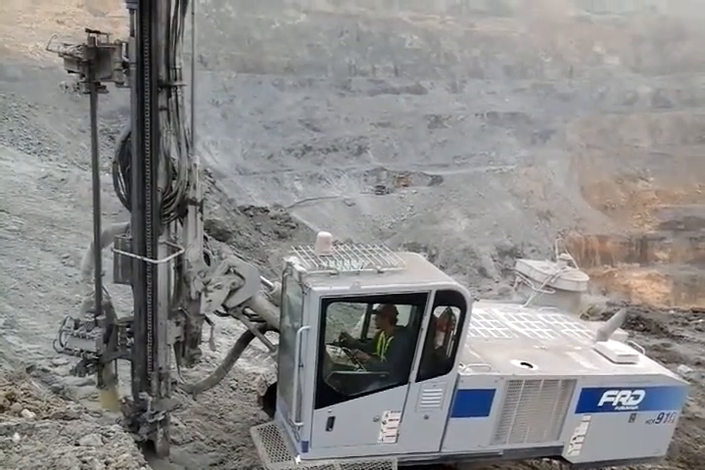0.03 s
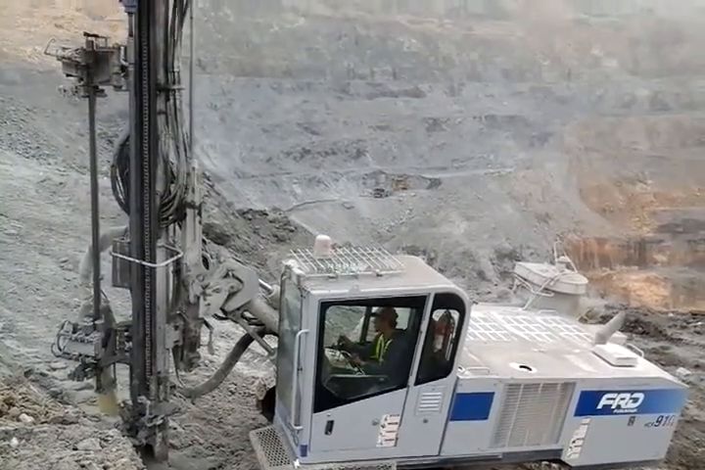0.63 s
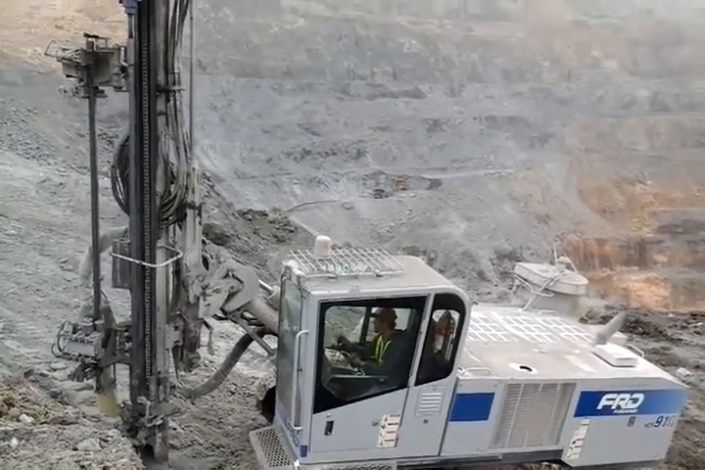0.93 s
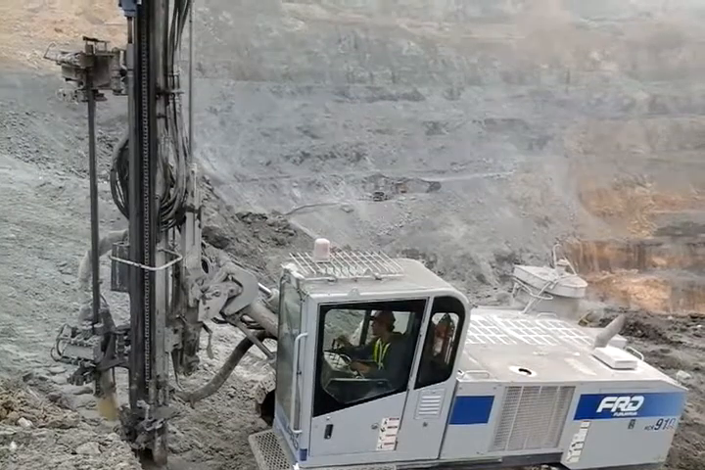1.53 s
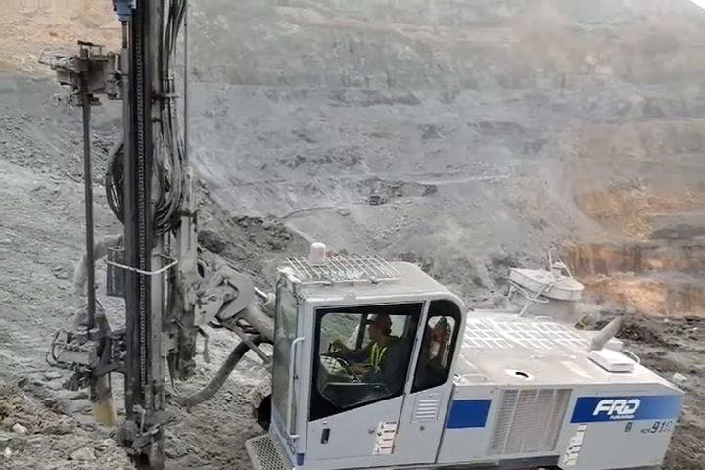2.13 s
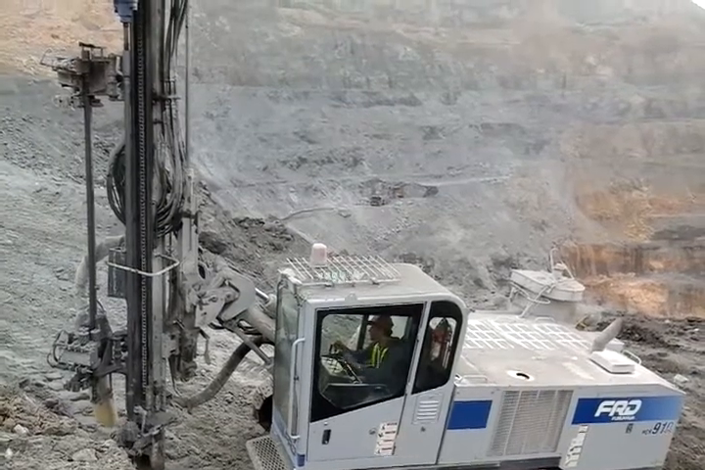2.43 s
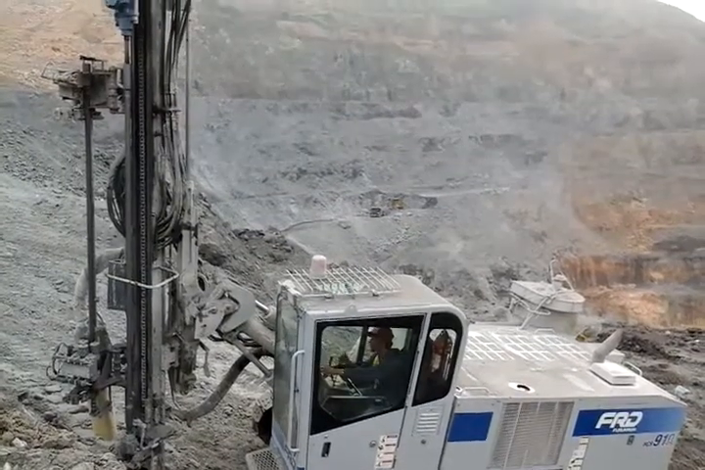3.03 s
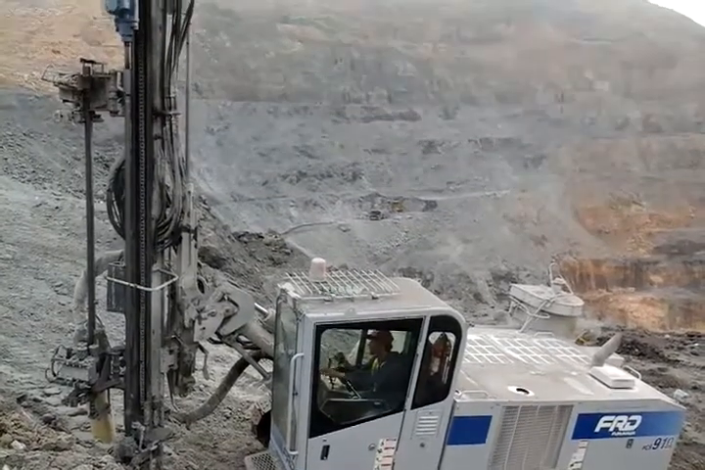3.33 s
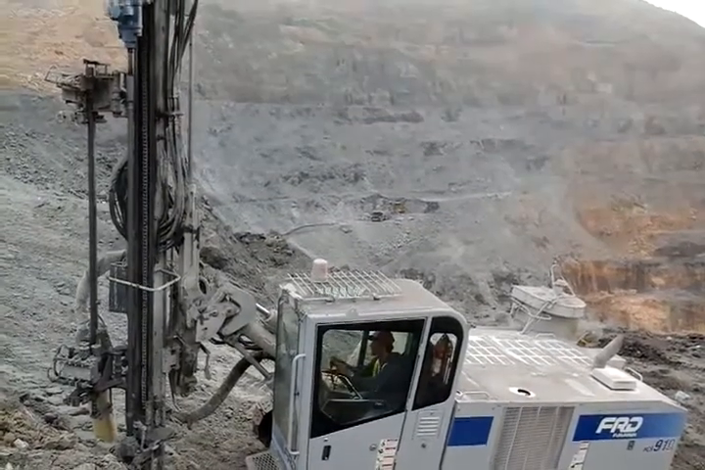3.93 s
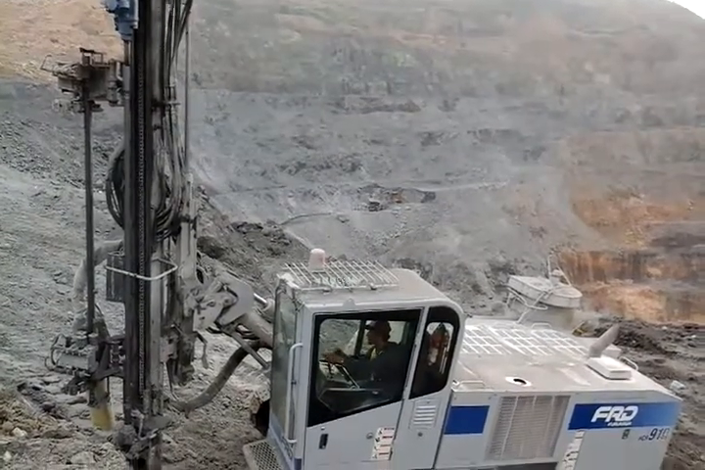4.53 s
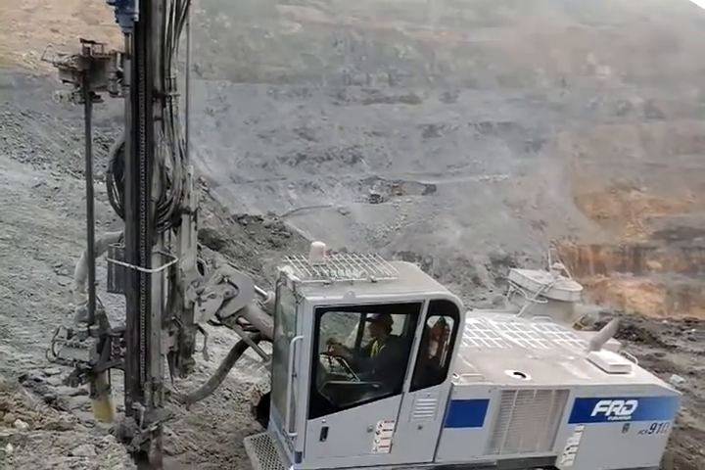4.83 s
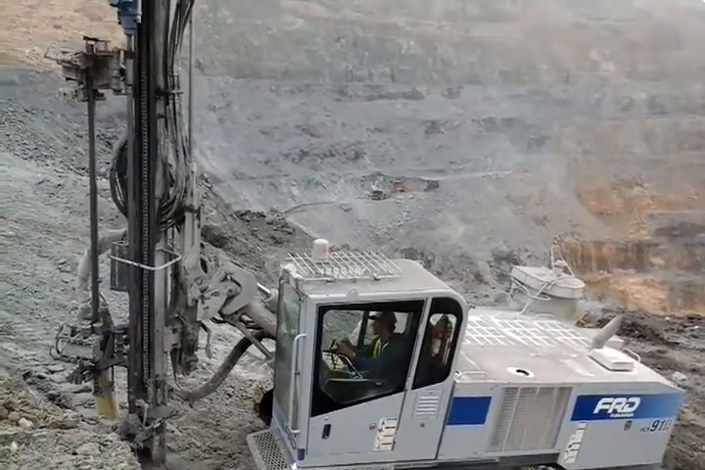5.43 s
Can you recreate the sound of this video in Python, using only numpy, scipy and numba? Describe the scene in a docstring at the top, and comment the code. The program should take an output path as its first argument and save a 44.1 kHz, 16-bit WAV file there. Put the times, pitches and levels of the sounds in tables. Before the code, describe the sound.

Two loud bursts of fast, ringing steel hammering cut through a drill rig's engine roar and air hiss, with a hydraulic whine between them.

```python
"""Light hammer taps sound over the roar of a tracked rock drill in an open quarry. Twice the piston then
hammers hard, and the long drill steel rings in a ladder of longitudinal modes while its couplings clatter.
Behind it are a throbbing diesel, humming gears and the turbulent noise of cooling fan and flushing air.
The load drops midway: the roar eases, the gears run down and a hydraulic pump whines. The blows overload
the right microphone, whose port resonates near 6 kHz, and gain control ducks the roar."""
import sys
import numpy as np
from scipy import signal
from scipy.fft import rfft, irfft, next_fast_len
from scipy.io import wavfile
from scipy.ndimage import uniform_filter1d, minimum_filter1d, map_coordinates
from numba import njit

SR = 44100
rng = np.random.default_rng(int(sys.argv[2]) if len(sys.argv) > 2 else 0)


def digitize_waveform(pressure):
    """Quantize a signal to 16-bit integers and store it at the path in sys.argv[1].

    Rows of a 2-D input are taken as channels; values are limited to [-1, 1].
    """
    field = np.atleast_2d(pressure).T
    bounded = np.clip(field, -1, 1)
    quanta = np.round(bounded * 32767).astype(np.int16)
    wavfile.write(sys.argv[1], SR, quanta)


N = 250929
TIME = np.arange(N) / SR


def amp(db):
    """Amplitude ratio of a level in decibels."""
    return np.exp(np.asarray(db) * np.log(10) / 20)


def unit(x):
    """Normalisation to rms 1."""
    return x / np.sqrt(np.mean(x ** 2) + 1e-20)


def along(points, hz):
    """Interpolation of (f/Hz, value) points on a logarithmic frequency axis."""
    f, v = np.transpose(points)
    return np.interp(np.log(hz + 1), np.log(f + 1), v)


def wobble(rate):
    """Smooth random modulation: a spline through rate Gaussian knots a second."""
    position = np.arange(N) * rate / SR
    knots = rng.standard_normal(int(position[-1]) + 4)
    return np.interp(position, position[::32], map_coordinates(knots, [position[::32]]))


def filtered(x, response):
    """Linear filtering: the spectrum of x times a complex frequency response."""
    m = next_fast_len(N + SR // 2)
    return irfft(rfft(x, m) * response(np.fft.rfftfreq(m, 1 / SR)), m)[..., :N]


# likeness of left and right; the bass arrives in opposite phase: f/Hz, correlation
CORRELATION = [(30, 0.096), (60, -0.87), (280, -0.95), (620, -0.74), (1350, 0.0015), (2900, 0.56),
               (6400, -0.22), (14000, 0.21)]
def spread(hz):
    """Correlation between the channels sets an angle from mid (0) to side (pi / 2)."""
    return np.arccos(np.clip(along(CORRELATION, hz), -1, 1)) / 2


def rush(spectrum, patchy_db):
    """Turbulence: stereo noise of rms 1, its gain varying in patches of time and frequency."""
    cells = signal.stft(rng.standard_normal((2, N)), nperseg=512)[2]
    patches = uniform_filter1d(rng.standard_normal(cells.shape[1:]), size=5, axis=0)
    patches = unit(uniform_filter1d(patches, size=14, axis=1))
    direct, diffuse = signal.istft(cells * amp(patchy_db * patches), nperseg=512)[1][:, :N]
    colour = lambda hz: amp(along(spectrum, hz))
    # the direct part of the side signal reaches the left a little earlier
    early = lambda hz: 0.26 / (1 + (hz / 6000) ** 2)
    shares = lambda hz: np.array([1j * early(hz), np.sqrt(1 - early(hz) ** 2)])
    mid = filtered(direct, lambda hz: colour(hz) * np.cos(spread(hz)))
    side = filtered([direct, diffuse], lambda hz: colour(hz) * np.sin(spread(hz)) * shares(hz)).sum(0)
    return unit(np.array([mid + side, mid - side]))


def tone(hz, waver_db):
    """Amplitude modulation: a stereo sinusoid of rms 1 whose strength wavers."""
    phase = 2 * np.pi * ((np.cumsum(hz) / SR + rng.random()) % 1)
    lead = spread(np.mean(hz))
    return np.sqrt(2) * np.sin([phase + lead, phase - lead]) * unit(amp(waver_db * wobble(6.83)))


# the rig works hard, then eases off: t/s, fraction of full load
DUTY = [(0, 0.77), (.65, 0.99), (1.4, 1), (1.95, .92), (3.119, 0.99), (3.55, 0.2)]
def load(lag_s=0):
    """Mechanical load on the rig, 0-1, delayed by lag_s."""
    return np.clip(np.interp(TIME - lag_s, *np.transpose(DUTY)), 0, 1)


# spectral density of the fan: f/Hz, relative level/dB
FAN_SPECTRUM = [(100, -22), (400, -1.5), (560, 3), (780, -2), (1000, -4), (1300, -2), (1600, -11.5),
                (2200, -7.5), (5000, -63), (12000, -81)]
def cooling_fan():
    """Turbulence at the fan makes a broadband rush, nearly independent of load."""
    return amp(-28.5 - 0.3 * load() + 0.4 * wobble(25)) * rush(FAN_SPECTRUM, patchy_db=1)


# spectral density of the air: f/Hz, relative level/dB
AIR_SPECTRUM = [(300, -19), (1200, 4), (2200, 2.5), (3000, 3), (3500, 1.5), (4100, 3), (5000, 1),
                (6500, 2.5), (8000, -4), (9800, -6.5), (11500, -14.5), (14500, -28)]
# brief swells of hiss, one midway, two lifting the ducked hiss after each burst of hammering:
# t/s, half width/s, level rise/dB
HISS_SWELLS = [(1.296, 0.045, 2), (2.823, .05, 1.5), (5.01, 0.069, 3.5)]
def flushing_air():
    """Flow noise hisses and spits, louder and brighter with load and in each brief swell."""
    swell_db = sum(db * np.exp(-((TIME - s) / width) ** 2) for s, width, db in HISS_SWELLS)
    lift_db = 3 * load() + swell_db + 0.3 * wobble(4.65)
    level_db = -26.5 + lift_db + 0.23 * wobble(30) + 0.39 * wobble(220)
    hiss = amp(level_db) * rush(AIR_SPECTRUM, patchy_db=0.93)
    treble = filtered(hiss, lambda hz: 1 / (1 + (8000 / (hz + 1)) ** 6))
    return hiss + treble * (amp(1.67 * (lift_db - np.mean(lift_db))) - 1)


def firing_rate(no_load_hz=63.5, droop_hz=3.5):
    """Speed droop: load lowers the diesel's firing frequency."""
    return (no_load_hz - droop_hz * load()) * (1 + 0.001027 * wobble(8))


def diesel(firing_hz, turbo_lag_s=0.32):
    """Periodic firing modulates a roar that swells with load; the exhaust tones grow as load falls."""
    firing = np.cos(2 * np.pi * np.cumsum(firing_hz) / SR)
    throb = 1 + 0.11 * firing
    roar_db = -28 + 5.5 * load(turbo_lag_s) + 0.36 * wobble(21.5)
    roar = amp(roar_db) * unit(throb * engine_noise())
    drone = amp(-34.5 - 16 * load()) * unit(firing * amp(3 * wobble(9)))
    overtone = amp(-32 - 25 * load()) * tone(6 * firing_hz, waver_db=3)
    return roar + np.outer([1.05, -0.9], drone) + overtone


# spectral density of the engine: f/Hz, relative level/dB
ENGINE_SPECTRUM = [(20, -35), (45, -24), (85, -17.5), (135, -13.5), (170, -11.5), (210, -0.5), (260, 1.4),
                   (320, -3), (400, -7), (520, -15.5), (900, -12.5), (3000, -87)]
def engine_noise():
    """Stationary noise, strongest near 260 Hz, is the carrier of the diesel's roar."""
    return rush(ENGINE_SPECTRUM, patchy_db=0)


# pump tones: multiple of the firing rate, relative level/dB
PUMP_HARMONICS = [(9, -11), (12, -9), (15, -4), (47, -15), (48, -15), (49, -17)]
# valve strokes: opening t/s, closing t/s, level/dB
VALVE_STROKES = [(3.506, 4.38, -28.5), (5.197, 5.328, -27)]
def hydraulic_pump(firing_hz, open_s=0.065, close_s=0.1):
    """The pump whines in harmonics of the firing rate while a valve is open."""
    whine = sum(amp(db) * tone(k * firing_hz, waver_db=1) for k, db in PUMP_HARMONICS)
    valve = sum(amp(db) * np.interp(TIME, [start, start + open_s, end, end + close_s], [0, 1, 1, 0])
                for start, end, db in VALVE_STROKES)
    return valve * whine


# shaft speed of the drive that turns the rod: t/s, f/Hz
SHAFT_SPEED = [(0, 109.8), (1.4, 112.2), (2.2, 112), (3, 109.3), (3.2, 107.1), (3.45, 95)]
# shaft and gear tones: multiple of the shaft speed, level/dB at full load
GEAR_ORDERS = [(1, -49.5), (3.62, -42), (4, -33), (6.86, -37), (7.72, -38.5), (9.76, -36), (11.4, -40),
               (12.6, -44), (20.6, -42)]
def rotation_drive():
    """Meshing gears hum at set ratios to the shaft speed, sinking and fading as the drive runs down."""
    shaft_hz = np.interp(TIME, *np.transpose(SHAFT_SPEED)) * (1 + 0.00145 * wobble(9))
    hum = sum(amp(db) * tone(k * shaft_hz, waver_db=2) for k, db in GEAR_ORDERS)
    return amp(25.5 * (load() - 1)) * hum


# runs of blows: first t/s, last t/s, count, fractional growth of the gap per blow,
# first level/dB, last level/dB, first T60/s, last T60/s
BLOW_RUNS = [(.02, 0.479, 10, -0.016, -8.5, -15.5, 0.019, .05),
             (0.536, 0.7, 4, -0.073, -8, -7.5, 0.019, 0.023), (.746, 0.95, 9, -.018, 7.5, 3.5, 0.18, 0.14),
             (.974, 1.154, 7, .04, 5, 5, 0.13, 0.066), (1.188, 1.263, 3, 0.106, -4, -3.5, 0.088, 0.091),
             (4.58, 4.869, 8, -0.01, 4, 7.5, .4, 0.38)]
# lone blows as the piston starts and stalls: t/s, level/dB, T60/s
LONE_BLOWS = [(.715, 0, .12), (1.314, -18, 0.089), (4.428, -26, .074), (4.455, -13.5, 0.043),
              (4.516, -14, 0.044), (4.534, -1.5, .27), (4.916, 3.5, 0.43)]
def piston_blows(scatter_db=2.08):
    """An impact train, (t/s, level/dB, T60/s): gap, strength and decay time drift along each run."""
    blows = list(LONE_BLOWS)
    for first, last, count, growth, first_db, last_db, first_t60, last_t60 in BLOW_RUNS:
        beats = np.append(0, np.cumsum((1 + growth) ** np.arange(count - 1)))
        times = first + (last - first) * beats / beats[-1]
        level_db = np.linspace(first_db, last_db, count) + scatter_db * rng.standard_normal(count)
        blows += zip(times, level_db, np.geomspace(first_t60, last_t60, count))
    return blows


# modes of a loose coupling sleeve: f/Hz, level/dB
SLEEVE_MODES = [(4572, -24), (6400, -22.5), (8380, -28), (8580, -28.5), (9650, -28)]
def sleeve(blows, t60_s=0.054):
    """Damped free vibration: the sleeve clinks equally hard at every blow."""
    t = np.arange(SR // 5) / SR
    hz, db = np.transpose(SLEEVE_MODES)
    clinks = np.zeros((2, N + SR))
    for s, _, _ in blows:
        ring = amp(db) @ np.sin(2 * np.pi * (np.outer(hz, t) + rng.random((2, len(hz), 1))))
        start = round(s * SR)
        clinks[:, start:start + len(t)] += np.sqrt(2) * ring * amp(-60 * t / t60_s)
    return clinks[:, :N]


# longitudinal modes of the steel, about 400 Hz apart: f/Hz, relative level/dB
STEEL_MODES = [(2140, -30), (2610, -7.5), (2912, -8), (3537, -6.5), (3865, -11), (4204, -10), (4572, -2),
               (5300, -8.5), (5680, -9), (6072, 2.5), (6478, -3), (6884, 0), (7287, -3.5), (7704, -9.5),
               (8110, -10.5), (8540, -9), (9448, -6.5)]
# spectral density of the couplings' clatter: f/Hz, relative level/dB
CLATTER_SPECTRUM = [(100, -10.5), (300, -14), (550, 1), (800, -8.5), (1500, -3), (3000, -0.5), (4500, -7.5),
                    (6500, 6), (8000, -4), (9600, -0.5), (11000, -3.5), (14500, -12)]
def drill_steel(blows, grip_s=4.94, grip_t60_s=0.12):
    """Impacts excite modes and rattle couplings; the freer the steel, the longer and purer its ring."""
    t = np.arange(SR // 3) / SR
    mode_hz, mode_db = np.transpose(STEEL_MODES)
    # the bit's shifting grip on the rock makes every mode wander in phase
    wander = 0.0432 * np.cumsum(rng.standard_normal((len(mode_hz), len(t))), axis=1)
    modes = np.exp(1j * (2 * np.pi * np.outer(mode_hz, t) + wander))
    clatter = unit(filtered(rng.standard_normal((2, N)), lambda hz: amp(along(CLATTER_SPECTRUM, hz))))
    rattle_power, ring = np.zeros(N + SR), np.zeros((2, N + SR))
    rise = 1 - np.exp(-t / 0.0005)
    for s, db, t60 in blows:
        envelope = amp(db - 60 * t / t60) * rise
        strength = amp(mode_db + 3.16 * rng.standard_normal((2, len(mode_hz))))
        strike = strength * np.exp(2j * np.pi * rng.random(strength.shape))
        ring_share = np.clip(0.18 + t60 / 0.57, 0, 1)
        start = round(s * SR)
        ring[:, start:start + len(t)] += np.sqrt(ring_share) * envelope * unit((strike @ modes).real)
        rattle_power[start:start + len(t)] += (1 - ring_share) * envelope ** 2
    steel = amp(1) * ring[:, :N] + amp(-1) * np.sqrt(rattle_power[:N]) * clatter
    grip_db = -60 * np.maximum(TIME - grip_s, 0) / grip_t60_s  # held fast, the steel stops ringing
    return steel * amp(grip_db) * amp([[-1.5], [-1.8]])


def scene():
    """Superposition of the running machinery and the hammering."""
    blows = piston_blows()
    firing_hz = firing_rate()
    machinery = diesel(firing_hz) + hydraulic_pump(firing_hz) + rotation_drive()
    return machinery + cooling_fan() + flushing_air() + drill_steel(blows) + sleeve(blows)


def resonance(hz, centre_hz, q):
    """Second-order response of an air cavity: flat well below its centre, falling above."""
    return 1 / (1 - (hz / centre_hz) ** 2 + 1j * hz / (centre_hz * q))


def port(hz):
    """Helmholtz resonance: the microphone port is a small bottle, with a weaker second peak higher up."""
    upper = 0.11 * resonance(hz, centre_hz=9050, q=11.3) * 1j * hz / 9400
    return resonance(hz, centre_hz=5725, q=9.67) * (1 + upper)


def overload(x, ceiling_db, fold_db, fold, leak_hz):
    """Nonlinearity: the capsule saturates, then folds back, adding sum and difference tones."""
    oversampled = signal.resample_poly(x, 2, 1, axis=1)
    folded = oversampled - fold * np.maximum(oversampled - amp(fold_db), 0)
    saturated = np.clip(folded, -amp(ceiling_db), amp(ceiling_db))
    distortion = signal.resample_poly(saturated - oversampled, 1, 2, axis=1)
    # the slowest part of the distortion leaks away through the capsule's vent
    vent = lambda hz: 0.1 - 1.087 * (hz / leak_hz) ** 2 * resonance(hz, leak_hz, q=0.54)
    return x + filtered(distortion, vent)


@njit
def follow(need_db, attack_samples, step_db):
    """Envelope following: the gain in dB drops exponentially and climbs back at a steady rate."""
    out, gain = np.empty_like(need_db), 0.
    for i, need in enumerate(need_db):
        gain += (need - gain) / attack_samples if need < gain else min(need - gain, step_db)
        out[i] = gain
    return out


def gain_control(x, limit_db, attack_s, hold_s, recovery_db_per_s):
    """Linked compression: both sides are turned down when the louder one passes the limit."""
    power = np.abs(uniform_filter1d(x ** 2, size=220, axis=1)).max(axis=0)
    level_db = 10 * np.log10(power + 1e-9)
    span = 2 * int(hold_s * SR / 2) + 1
    need_db = minimum_filter1d(np.minimum(limit_db - level_db, 0), span, origin=span // 2)
    return x * amp(follow(need_db, attack_s * SR, recovery_db_per_s / SR))


def record(dry, top_hz=14560):
    """Transduction: right port resonance, capsule overload, gain control, clipping and a band limit."""
    pressure = np.array([dry[0], filtered(dry[1], port)])
    distorted = overload(pressure, ceiling_db=6, fold_db=12, fold=6, leak_hz=275)
    ducked = gain_control(distorted, limit_db=-6, attack_s=0.073, hold_s=0.022, recovery_db_per_s=67)
    return filtered(np.clip(ducked, -1, 1), lambda hz: hz < top_hz)


dry = scene()
out = record(dry)
digitize_waveform(out)
```